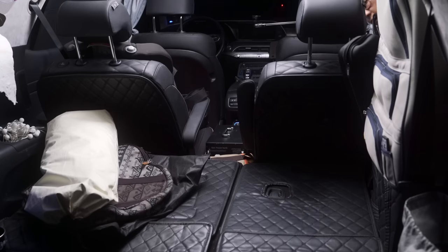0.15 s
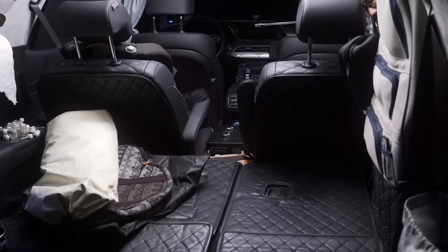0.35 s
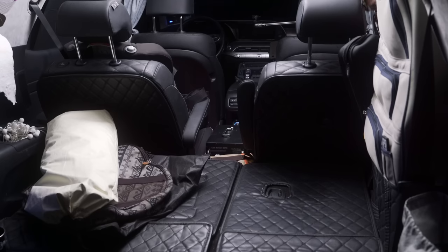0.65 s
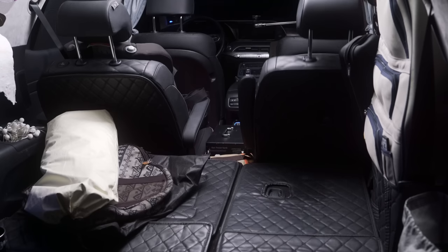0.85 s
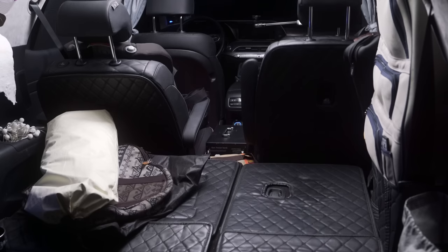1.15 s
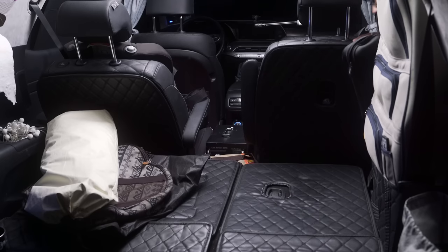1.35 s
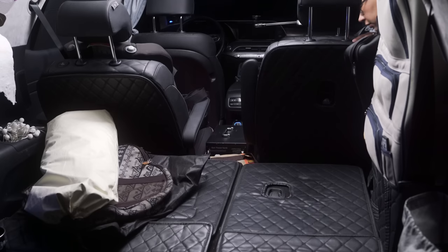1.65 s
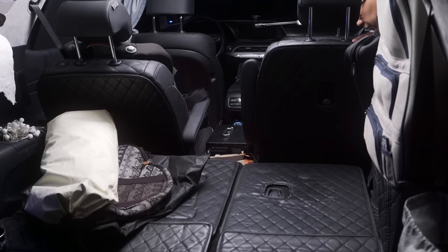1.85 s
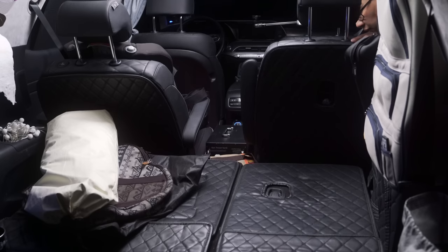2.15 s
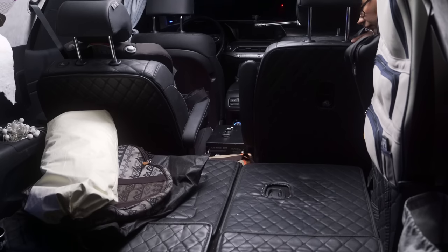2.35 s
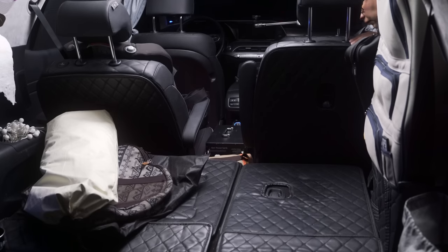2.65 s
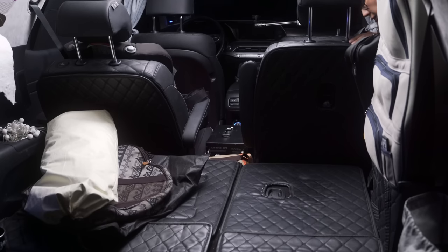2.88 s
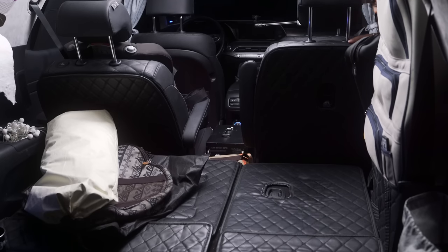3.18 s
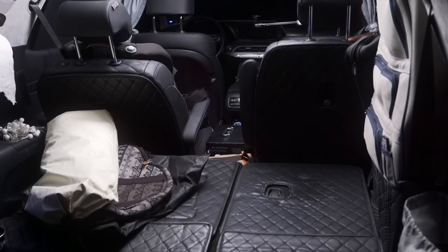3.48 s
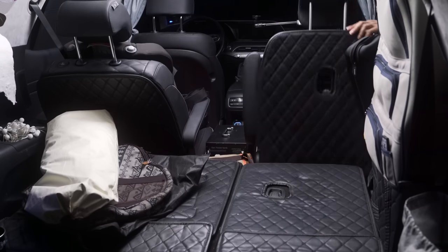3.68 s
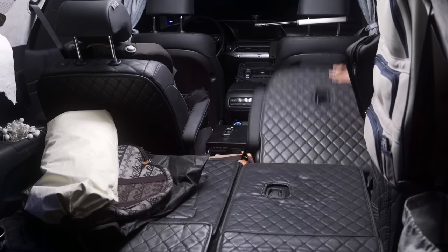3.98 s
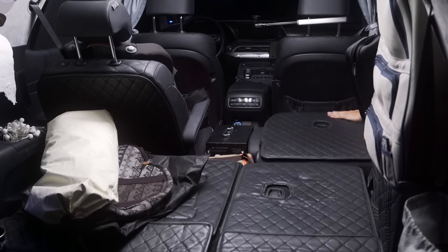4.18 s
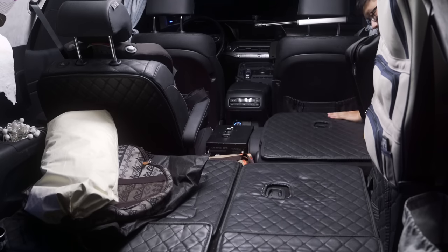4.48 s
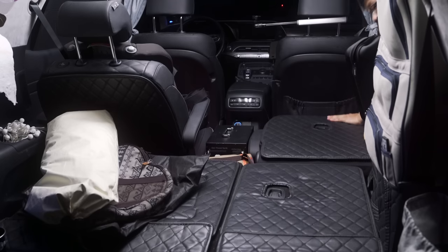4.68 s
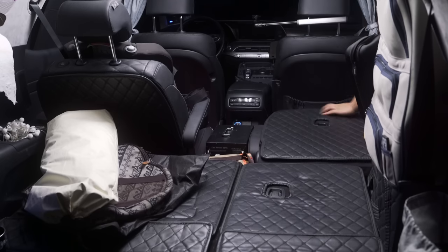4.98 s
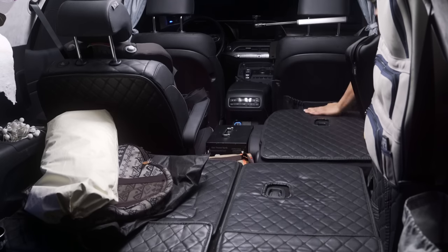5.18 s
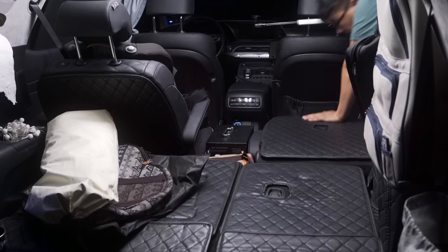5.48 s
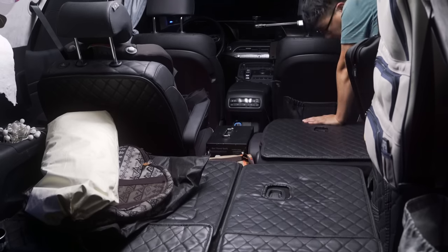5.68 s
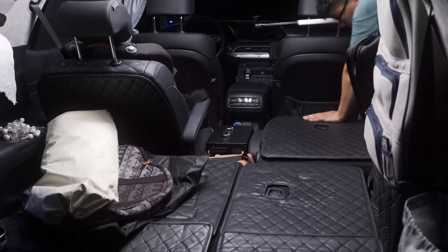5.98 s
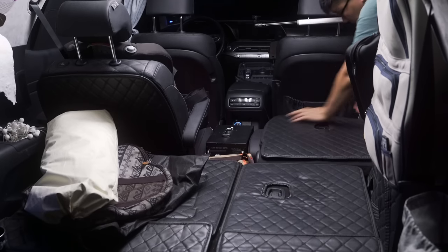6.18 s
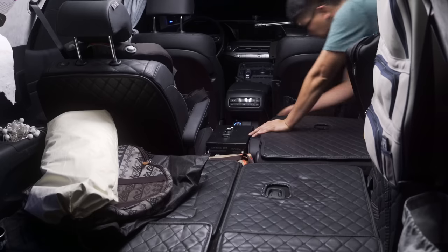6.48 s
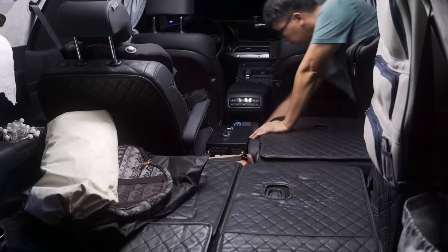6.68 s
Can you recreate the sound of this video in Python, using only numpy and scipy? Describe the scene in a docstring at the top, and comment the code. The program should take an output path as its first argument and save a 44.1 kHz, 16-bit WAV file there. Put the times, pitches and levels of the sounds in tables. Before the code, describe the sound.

A loud metallic and plastic clunk opens, followed by small knocks and ratcheting rattles of a padded car seat. A second heavy clunk leaves a brief low spring ring. The seat then folds with rustle and a thump, and cloth rubs, a sharp knock and light taps finish. Padded cabin with very short reverberation, close microphone, quiet night air, faint hum and thin cricket chirping behind.

```python
"""Car seat folded at night

A car seat is unlatched, slid and folded flat in a parked car, then a hand leans and sweeps on it.
Blows ring the damped modes of padded frame and plastic shell; stick-slip grains make cloth and leather rub.
The loudest clunks overload. Outside, noise bands and pulsed tones make crickets, over soft air and a faint hum."""
import sys
import numpy as np
from scipy import signal
from scipy.fft import rfft, irfft, next_fast_len
from scipy.io import wavfile

SR = 44100
rng = np.random.default_rng(int(sys.argv[2]) if len(sys.argv) > 2 else 0)


def output_pcm(signal):
    """Save a mono or channel-first signal as 16-bit PCM at the path in sys.argv[1].

    Samples are clipped to [-1, 1] before scaling.
    """
    pcm = np.clip(np.atleast_2d(signal).T, -1, 1) * 32767
    wavfile.write(sys.argv[1], SR, np.round(pcm).astype(np.int16))


N = 301644

# Night air in the cabin, relative spectrum: [pitch_hz, level_db]
AIR_SPECTRUM = [(20, -17), (70, -4), (200, -17), (500, 0.5), (1000, -4.5), (3000, 16), (3700, -14.5),
                (5700, -26.5), (7000, -10), (12000, 5.5), (16000, 2.5)]
AIR_DB, HUM_HZ, HUM_DB = -64.5, 127, -54

# Distant insect choruses: [centre_hz, width_hz, level_db]
CHORUSES = [(4383, 760, -53), (7890, 670, -57)]
CHIRPS_PER_S, CHIRP_PEAK_S, CHIRP_HZ, CHIRP_DB = 4.66, 0.027, 4580, -51
WING_STROKES_HZ = 69

# Calls of a lower cricket: [start_s, length_s, level_db]
LOW_CALLS = [(.98, 0.23, -64), (1.38, 0.1, -63), (1.60, .16, -58), (1.86, .17, -57)]
LOW_CALL_HZ = 3720

# Swells of the near cricket: [start_s, length_s, level_db]
TRILL_SWELLS = [(3.29, 0.28, -43.5), (5.192, 0.27, -43.5)]
TRILL_HZ, SAG_HZ_PER_S = 4315, 100
SWELL_RISE_S, SWELL_FALL_S = 0.07, 0.15
MURMUR_FROM_S, MURMUR_DB = 3.9, -51.5

CABIN_T60_S, CABIN_DB, CABIN_CUT_HZ = 0.2, -17.5, 10700
STOP_HZ = 15800

# A seat spring that sings on after one clunk, a single row: [start_s, pitch_hz, level_db, t60_s]
SPRING_MODE = (2.69, 214, -32, .66)

# Modes of the padded frame: [pitch_hz, level_db, t60_s]
FRAME_MODES = [(53.4, -12, 0.31), (100.4, -1, 0.16), (138.9, 4.5, 0.1), (183.7, -1, 0.071),
               (202.5, -0.5, 0.12), (228, 5.5, 0.071), (295.3, 4.5, 0.08), (351, 4, 0.055), (408, 6, 0.033),
               (512.5, 4.5, 0.046)]
# Modes of the plastic shell, nearly equal in level: [pitch_hz, level_db, t60_s]
SHELL_MODES = [(626, 0.023, 0.021), (730, 0.0064, 0.03), (836, 0.026, 0.022), (960, 0.03, 0.027),
               (1124, 0, 0.027), (1245, 0.02, 0.021), (1410, 0.004, 0.023), (1600, 0.066, 0.018),
               (1930, 0.0051, 0.013), (2225, 0.028, 0.0099)]

# Latch and rails under a crack, relative spectrum: [pitch_hz, level_db]
CRACK_SPECTRUM = [(1060, -10.5), (1800, -20), (2190, -18), (2450, -16.5), (2800, -20), (3050, -14),
                  (3870, -2.5), (5130, -19), (6000, -25.5), (7800, -35), (13200, -120)]
# Bright sizzle of a blow and hiss of the cloth, relative spectrum: [pitch_hz, level_db]
SIZZLE_SPECTRUM = [(3240, -0.5), (5500, -6), (6020, -7), (7100, -8.5), (15500, -18.5)]
# Cloth rustle, relative spectrum: [pitch_hz, level_db]
RUSTLE_SPECTRUM = [(940, 7), (1600, 1.5), (2330, 0.5), (2880, 0.5), (3850, 4), (5460, -21), (7500, -24.5),
                   (9750, -26.5), (16500, -120)]

# Handling of the seat, load on the frame and slip of the leather: [time_s, load_db, slip_db]
HANDLING = [(0.0, -23.5, -44), (0.27, -44, -53), (0.55, -56, -65.5), (0.68, -40, -47.5),
            (0.85, -48.5, -51.5), (1.33, -39, -51), (1.5, -54, -59), (1.75, -60, -69), (2.11, -44, -65.5),
            (2.38, -38, -60.5), (2.6, -39.5, -48.5), (2.9, -54.5, -68), (3.35, -46.5, -55),
            (3.54, -47, -55), (3.73, -43.5, -52), (3.9, -48, -59), (4.3, -49.5, -69), (4.6, -67.5, -66),
            (4.78, -49, -55.5), (5.0, -42.5, -45.5), (5.1, -69, -70), (5.4, -67, -59), (5.49, -35, -50.5),
            (5.65, -45, -39.5), (5.9, -44, -56), (6.17, -62, -66.5), (6.53, -54, -52), (6.71, -57, -52),
            (6.84, -58, -70)]
# Cloth sweeps over the seat: [peak_s, rise_s, fall_s, rustle_db, hiss_db]
CLOTH_SWEEPS = [(0.82, 0.051, 0.15, -63, -56), (2.379, 0.11, 0.082, -41.5, -48),
                (3.75, 0.1, 0.17, -45.5, -70), (4.08, 0.1, 0.12, -46.5, -56.5),
                (5.012, 0.028, 0.031, -39, -43), (5.18, 0.09, 0.082, -55, -53.5),
                (5.64, 0.069, 0.1, -45.5, -42), (6.02, 0.11, 0.11, -53, -59), (6.29, 0.23, 0.16, -85, -53)]
# Rustle at the mean slip, share of the slip's swing in dB, hiss relative to the steady rustle
RUSTLE_DB, RUSTLE_FOLLOWS, HISS_DB = -60, 0.13, -1
TICKS_PER_S, TICK_DB, TICK_T60_S = 11, -54.5, 0.02
# Loose trim taps the shell; the last is the share of the slip's swing in dB
TAPS_PER_S, TAP_DB, TAP_HZ, TAP_FOLLOWS = 35, -49, 950, 0.63

# Blows on the seat: [start_s, crack_centre_hz, shell_peak_db, shell_centre_hz, thud_db, thud_centre_hz,
# crack_db, sizzle_db, contact_t60_s]
BLOWS = [(0.011, 2370, -1, 1210, -8, 314, -16, -43, 0.017),
         (0.019, 2430, -16, 1230, -14, 195, -21, -30, 0.071),
         (0.039, 2660, -23, 945, -16.5, 187, -10, -12, 0.1),
         (0.06, 4000, -25, 1000, -18.5, 137, -18.5, -25, 0.04),
         (0.141, 2730, -36, 900, -42, 152.7, -40, -37.5, 0.088),
         (0.17, 2480, -28, 930, -37, 104, -38, -54, 0.068),
         (0.479, 2180, -41, 870, -45, 410, -44, -56, 0.063),
         (0.654, 2940, -35, 795, -39.5, 298, -44.5, -60, 0.15),
         (0.739, 2350, -34, 1140, -68, 291, -41.5, -47, 0.03),
         (0.822, 3580, -38, 610, -38.5, 506, -59, -59, 0.16),
         (0.918, 3060, -51, 619, -30, 250, -41, -50, 0.094),
         (0.961, 2750, -32.5, 860, -57, 231, -44, -46, 0.05),
         (1.04, 2040, -36, 1170, -48, 495, -44.5, -52, 0.039),
         (1.129, 3120, -26.5, 890, -28.5, 294, -41, -59, 0.056),
         (1.155, 3220, -23, 860, -23, 328, -46, -62, 0.078),
         (1.17, 2100, -20.5, 1060, -30, 216, -35.5, -55, 0.11),
         (1.199, 2250, -17.5, 626, -27, 286, -21.5, -38, 0.075),
         (1.247, 2240, -27, 955, -27, 304, -53, -56, 0.048),
         (1.297, 2540, -32, 1020, -51, 425, -43.5, -55, 0.043),
         (1.33, 3660, -27.5, 930, -42.5, 332, -54, -53, 0.043),
         (1.376, 4240, -30.5, 860, -45.5, 242, -49, -54, 0.01),
         (1.429, 4110, -37, 972, -47, 509, -70, -69, 0.018),
         (1.692, 4060, -30, 895, -55, 132, -55, -45, 0.064),
         (1.759, 3380, -61, 686, -43.5, 220, -61, -56, 0.042),
         (1.904, 3820, -39.5, 678, -35.5, 188, -66, -72, 0.031),
         (1.994, 2700, -37, 660, -44, 339, -48, -69, 0.058),
         (2.069, 2080, -46, 600, -31, 209, -54, -64, 0.04),
         (2.087, 2880, -37, 800, -27.5, 233, -47, -53, 0.07),
         (2.13, 2230, -41, 730, -32.5, 126, -40.5, -56, 0.083),
         (2.355, 3420, -45, 1360, -31.5, 136, -56, -49, 0.024),
         (2.408, 2520, -12.5, 880, -3.5, 318, -40, -28, 0.069),
         (2.42, 4150, -13.5, 665, -8, 140, -28.5, -32, 0.05),
         (2.456, 4200, -20.5, 980, -28, 175, -61, -52, 0.088),
         (2.51, 4150, -47, 732, -29, 146, -62, -58, 0.025),
         (2.611, 2260, -38, 2100, -42, 315, -46, -59, 0.1),
         (2.628, 2800, -26, 1130, -42, 298, -33.5, -45, 0.072),
         (2.659, 3050, -40, 1120, -15, 298, -25, -22.5, 0.095),
         (2.683, 2160, -16, 636, -15, 360, -32, -33, 0.041),
         (3.075, 4230, -53, 657, -43.5, 188, -60, -57, 0.11),
         (3.339, 3000, -28.5, 1260, -40, 290, -35.5, -53, 0.083),
         (3.368, 4160, -29.5, 770, -34.5, 308, -55, -62, 0.064),
         (3.471, 2630, -33, 720, -37.5, 294, -42, -58, 0.089),
         (3.505, 4200, -27.5, 910, -33.5, 273, -60, -64, 0.087),
         (3.534, 4200, -29, 950, -34, 550, -50, -59, 0.026),
         (3.567, 4160, -27.5, 940, -49, 120, -54, -59, 0.022),
         (3.73, 3270, -54, 872, -38, 374, -68, -55, 0.083),
         (3.862, 3070, -25, 1140, -41, 286, -39, -42, 0.05),
         (3.889, 2570, -57, 1070, -36, 283, -45.5, -49.5, 0.23),
         (4.02, 3240, -42, 1090, -34.5, 246, -28, -35.5, 0.049),
         (4.113, 3100, -15.5, 1400, -22, 135, -17, -30, 0.044),
         (4.137, 2760, -23, 1240, -16, 148, -35, -41, 0.071),
         (4.184, 4160, -36, 750, -26, 153, -58, -63, 0.13),
         (4.352, 3660, -38, 643, -48.5, 128, -61, -67, 0.041),
         (4.562, 3400, -26.5, 910, -48.5, 430, -38.5, -52, 0.069),
         (4.592, 4460, -21, 860, -41, 544, -45, -39.5, 0.035),
         (4.686, 2340, -31.5, 1050, -55, 294, -41, -58, 0.02),
         (4.91, 3820, -26.5, 1130, -43, 218, -40.5, -43, 0.011),
         (5.002, 2530, -20.5, 1340, -49, 130, -34, -39, 0.046),
         (5.179, 3250, -36, 900, -60, 250, -40, -45, 0.035),
         (5.213, 3520, -39, 910, -63, 275, -32, -43, 0.027),
         (5.428, 3480, -38.5, 716, -39.5, 300, -53, -58, 0.089),
         (5.515, 2000, -46, 616, -40, 143, -55, -61, 0.032),
         (5.768, 2660, -11, 1260, -21, 314, -22, -41, 0.051),
         (5.8, 2350, -21, 780, -26, 560, -36, -48, 0.026),
         (5.819, 3280, -26, 890, -36, 211, -42, -40, 0.036),
         (5.91, 2300, -30.5, 780, -33.5, 235, -40.5, -55, 0.084),
         (5.993, 2100, -30, 770, -43, 367, -41, -64, 0.061),
         (6.06, 3980, -34.5, 940, -64, 140, -45, -44, 0.044),
         (6.116, 3780, -34.5, 1030, -64, 407, -47, -44.5, 0.019),
         (6.214, 3700, -39, 1040, -46.5, 436, -50, -65, 0.037),
         (6.243, 3420, -34.5, 695, -62, 258, -45, -44.5, 0.19),
         (6.29, 3400, -34.5, 740, -56, 493, -53, -45, 0.043),
         (6.524, 4200, -35.5, 850, -65, 129, -64, -60, 0.044),
         (6.694, 3940, -29.5, 710, -32.5, 71.5, -52, -51, 0.041)]
# The seat settles after a blow: rumble relative to its thud, creak to its shell, rustle to its crack
SETTLE_RUMBLE_DB, SETTLE_CREAK_DB, SETTLE_RUSTLE_DB, SETTLE_T60_S = -5.5, -32.5, -26, 0.16


def from_db(db):
    """Amplitude gain is ten to the power of decibels over twenty."""
    return 10 ** (np.asarray(db) / 20)


def rms_one(x):
    """Normalization: division by the root mean square leaves unit rms."""
    return x / np.sqrt(np.mean(x ** 2) + 1e-20)


def in_time(rows):
    """Linear interpolation turns table columns into curves, one value a sample."""
    s, *columns = np.transpose(rows)
    return [np.interp(np.arange(N) / SR, s, c) for c in columns]


def coloured(x, spectrum):
    """Spectral filtering: each frequency is weighted by a curve of level against log frequency."""
    size = next_fast_len(len(x))
    hz, db = np.transpose(spectrum)
    grid = np.maximum(np.arange(size // 2 + 1) * SR / size, 1)
    gain = from_db(np.interp(np.log(grid), np.log(hz), db))
    return irfft(rfft(x, size) * gain, size)[:len(x)]


def drift(rate_hz):
    """Low-passed noise wanders slowly, with unit rms; a double pole sets its rate."""
    step = 40  # samples between drawn values
    r = np.exp(-2 * np.pi * rate_hz * step / SR)
    noise = rng.standard_normal(N // step + 2002)
    slow = signal.lfilter([1], [1, -2 * r, r * r], noise)[2000:]  # the filter's start is dropped
    return np.interp(np.arange(N) / step, np.arange(len(slow)), rms_one(slow))


def decay_per_sample(t60_s):
    """Exponential decay: the factor a sample that loses 60 dB in t60_s."""
    return from_db(-60 / (t60_s * SR))


def ring(x, hz, t60):
    """A damped resonator is one mode; a unit click rings it with height near 1."""
    r, w = decay_per_sample(t60), 2 * np.pi * hz / SR
    return signal.lfilter([0, np.sin(w)], [1, -2 * r * np.cos(w), r * r], x + 1e-18)


def body(force, modes, centre_hz, octaves):
    """Modal superposition: a force rings every mode, most those near the centre set by where it lands."""
    out = 0
    for k, (hz, db, t60) in enumerate(modes):
        distance = np.log2(hz / centre_hz) / octaves
        out = out + (-1) ** k * from_db(db - 3.5 * distance ** 2) * ring(force, hz, t60)
    return out


def grains(per_s, spread_db):
    """Stick-slip as a random impulse train: slips of uneven size and either sign."""
    sizes = from_db(spread_db * np.minimum(rng.exponential(1, N), 4)) * rng.choice([-1, 1], N)
    return sizes * (rng.random(N) < per_s / SR)


def hump(peak_s, rise_s, fall_s):
    """A two-sided Gaussian envelope swells smoothly to height 1."""
    t = np.arange(N) / SR - peak_s
    return np.exp(-(t / np.where(t < 0, rise_s, fall_s)) ** 2)


def settling(column):
    """Energy decay: the powers of one column of the blows add and die away exponentially."""
    table = np.array(BLOWS)
    kicks = np.zeros(N)
    kicks[(table[:, 0] * SR).astype(int)] = from_db(2 * table[:, column])
    power = signal.lfilter([1], [1, -decay_per_sample(SETTLE_T60_S) ** 2], kicks + 1e-18)
    return np.sqrt(power)


def night_air():
    """Filtered broadband noise is the air; a sine of drifting frequency and level is the hum."""
    hum_phase = 2 * np.pi * np.cumsum(HUM_HZ + 1.5 * drift(2)) / SR
    hum = from_db(HUM_DB + 1.3 * drift(4)) * np.sin(hum_phase)
    return hum + from_db(AIR_DB) * rms_one(coloured(rng.standard_normal(N), AIR_SPECTRUM))


def crickets():
    """Many callers blur into noise bands; one steady chirper is a tone modulated by its wing strokes."""
    t = np.arange(N) / SR
    out = np.zeros(N)
    for hz, width_hz, db in CHORUSES:
        band = signal.butter(2, [hz - width_hz / 2, hz + width_hz / 2], "band", fs=SR, output="sos")
        out += from_db(db + 0.71 * drift(30)) * rms_one(signal.sosfilt(band, rng.standard_normal(N)))
    chirp = np.clip(1.5 * np.cos(2 * np.pi * CHIRPS_PER_S * (t - CHIRP_PEAK_S)) + 0.15, 0, 1)
    stroke_phase = 2 * np.pi * WING_STROKES_HZ * t
    strokes = (1 + 0.79 * np.sin(stroke_phase)) * from_db(1.9 * drift(40))
    pitch_hz = CHIRP_HZ + 120 * np.cos(stroke_phase) + 40 * drift(70)
    wing = np.sin(2 * np.pi * np.cumsum(pitch_hz) / SR)
    return out + from_db(CHIRP_DB) * chirp * rms_one(strokes * wing)


def low_cricket():
    """Amplitude modulation: half-wave pulses gate a tone of nearly constant pitch into short calls."""
    t = np.arange(N) / SR
    gate = np.zeros(N)
    for s, length, db in LOW_CALLS:
        gate += from_db(db) * np.clip(np.minimum(t - s, s + length - t) / 0.024, 0, 1)
    strokes = np.maximum(np.sin(2 * np.pi * 60 * t), 0)
    tone = np.sin(2 * np.pi * np.cumsum(LOW_CALL_HZ + 25 * drift(52)) / SR)
    return gate * rms_one(strokes * tone)


def trill():
    """Amplitude and frequency modulation: the near cricket pulses on a pitch that sags through each swell."""
    t = np.arange(N) / SR
    level = from_db(MURMUR_DB) * np.clip((t - MURMUR_FROM_S) / 0.18, 0, 1)  # the murmur fades in and stays
    sag_hz = np.zeros(N)
    for s, length, db in TRILL_SWELLS:
        before = np.maximum(s - t, 0) / SWELL_RISE_S
        after = np.maximum(t - s - length, 0) / SWELL_FALL_S
        level += from_db(db) * np.exp(-before ** 2 - after ** 2)
        from_middle = t - s - length / 2
        sag_hz += SAG_HZ_PER_S * from_middle * (np.abs(from_middle) < length)
    beat = np.clip(0.6 * np.sin(2 * np.pi * 41.5 * t) + 0.7, 0, 1)
    return level * beat * np.sin(2 * np.pi * np.cumsum(TRILL_HZ - sag_hz + 6 * drift(5.72)) / SR)


def cabin(x):
    """Reverberation by convolution: decaying, dulled noise is the response of the padded interior."""
    t = np.arange(SR // 2) / SR
    tail = rng.standard_normal(len(t)) * from_db(-60 * t / CABIN_T60_S) * (t > 0.003)
    tail = signal.lfilter(*signal.butter(1, CABIN_CUT_HZ, fs=SR), tail)
    tail /= np.sqrt(np.sum(tail ** 2))  # unit energy
    return x + from_db(CABIN_DB) * signal.fftconvolve(x, tail)[:N]


def spring():
    """Impulse response: one push sets a single low mode ringing freely."""
    s, hz, db, t60 = SPRING_MODE
    push = np.zeros(N)
    push[round(s * SR)] = from_db(db)
    return ring(push, hz, t60)


def rubbing():
    """Stick-slip friction: slow slips shake frame and shell, fast ones rustle and hiss; seams tick, trim taps."""
    load_db, slip_db = in_time(HANDLING)
    slip_swing_db = slip_db - slip_db.mean()
    grip = from_db(2 * drift(29))  # the grip comes and goes
    # Each mode catches slips of its own
    rumble = sum(from_db(db) * ring(grains(90, spread_db=5.5), hz, t60) for hz, db, t60 in FRAME_MODES)
    creak = sum(from_db(db) * ring(grains(120, spread_db=4.0), hz, t60 / 2) for hz, db, t60 in SHELL_MODES)
    rumble_level = from_db(load_db) + from_db(SETTLE_RUMBLE_DB) * settling(column=4)
    creak_level = from_db(slip_db) + from_db(SETTLE_CREAK_DB) * settling(column=2)

    cloth = grains(6000, spread_db=1.0)
    flicker = from_db(1.2 * drift(30))
    steady = from_db(RUSTLE_DB + RUSTLE_FOLLOWS * slip_swing_db)
    rustle_level = steady + from_db(SETTLE_RUSTLE_DB) * settling(column=6)
    hiss_level = steady * from_db(HISS_DB)
    for s, rise_s, fall_s, rustle_db, hiss_db in CLOTH_SWEEPS:
        swell = hump(s, rise_s, fall_s)
        rustle_level = rustle_level + from_db(rustle_db) * swell
        hiss_level = hiss_level + from_db(hiss_db) * swell
    seams = np.abs(grains(TICKS_PER_S, spread_db=2.0))
    ticks = signal.lfilter([1], [1, -decay_per_sample(TICK_T60_S)], seams + 1e-18)
    rustle_level = rustle_level + from_db(TICK_DB + slip_swing_db) * ticks

    taps = body(grains(TAPS_PER_S, spread_db=3.0), SHELL_MODES, TAP_HZ, octaves=0.64)
    out = from_db(TAP_DB + TAP_FOLLOWS * slip_swing_db) * taps
    out += rumble_level * grip * rms_one(rumble)
    out += creak_level * grip * rms_one(creak)
    out += rustle_level * flicker * rms_one(coloured(cloth, RUSTLE_SPECTRUM))
    out += hiss_level * flicker * rms_one(coloured(cloth, SIZZLE_SPECTRUM))
    return out


def blows():
    """Forced modal vibration: each blow is a dying burst of jolts that shakes frame, shell and latch."""
    out, size, head = np.zeros(N), SR // 2, SR // 50
    t = np.arange(size) / SR
    crack = rms_one(coloured(rng.standard_normal(N + size), CRACK_SPECTRUM))
    sizzle = rms_one(coloured(rng.standard_normal(N + size), SIZZLE_SPECTRUM))
    jolts = rng.standard_normal((len(BLOWS), size))
    for jolt, blow in zip(jolts, BLOWS):
        s, crack_hz, shell_db, shell_hz, thud_db, thud_hz, crack_db, sizzle_db, t60 = blow
        at = round(s * SR)
        contact = from_db(-60 * (t / max(t60, 0.005)) ** 1.99)
        contact *= np.minimum(t / (0.0054 * t60), 1)  # brief onset
        contact *= 1 + 0.94 * np.exp(-t / 0.0029)  # the first touch is the hardest
        shell = body(jolt * contact, SHELL_MODES, shell_hz, octaves=0.36)
        thud = body(jolt * contact ** 1.5, FRAME_MODES, thud_hz, octaves=0.36)
        rattle = crack[at:at + size]
        struck = rms_one(ring(rattle, crack_hz, 0.0034))
        rattle = 0.8 * rattle + 0.93 * struck  # the struck part of the latch stands out
        bright = from_db(crack_db) * rattle + from_db(sizzle_db) * sizzle[at:at + size]
        sound = from_db(shell_db) * shell / np.abs(shell).max() + bright * contact
        sound += from_db(thud_db) * thud / np.sqrt(np.mean(thud[:head] ** 2))  # level over the first 20 ms
        out[at:at + size] += sound[:N - at]
    return out


def scene():
    """Linear superposition: all sources add at one microphone, which feeds both channels."""
    outside = night_air() + crickets() + low_cricket() + trill()
    mono = outside + rubbing() + cabin(spring() + blows())
    return np.array([mono, mono])


def record(dry):
    """Band limiting and overload: the microphone drops deep bass, the input clips hard, the top is cut."""
    bass_cut = signal.butter(3, 46, "high", fs=SR, output="sos")
    top_cut = signal.cheby2(20, 60, STOP_HZ, fs=SR, output="sos")
    clipped = np.clip(signal.sosfilt(bass_cut, dry), -0.99, 0.99)
    return signal.sosfilt(top_cut, clipped)


dry = scene()
out = record(dry)
output_pcm(out)
```